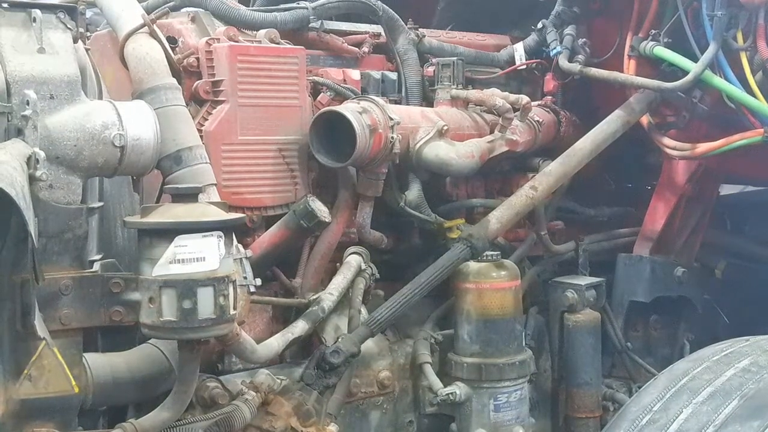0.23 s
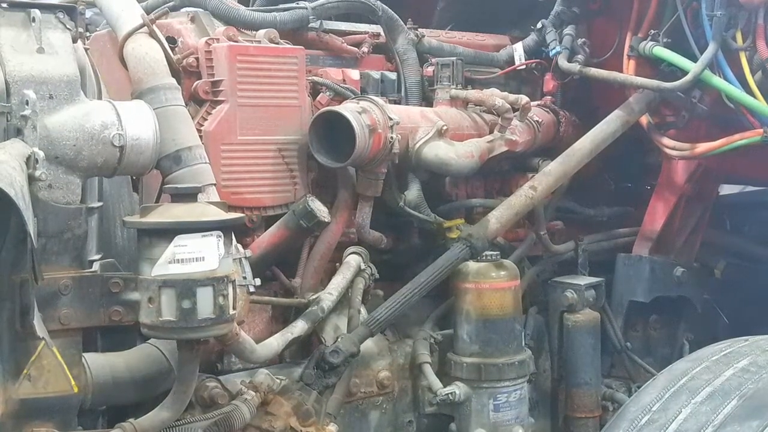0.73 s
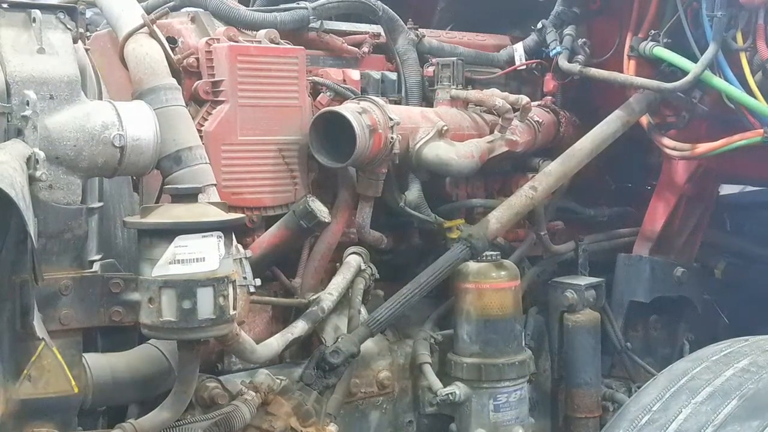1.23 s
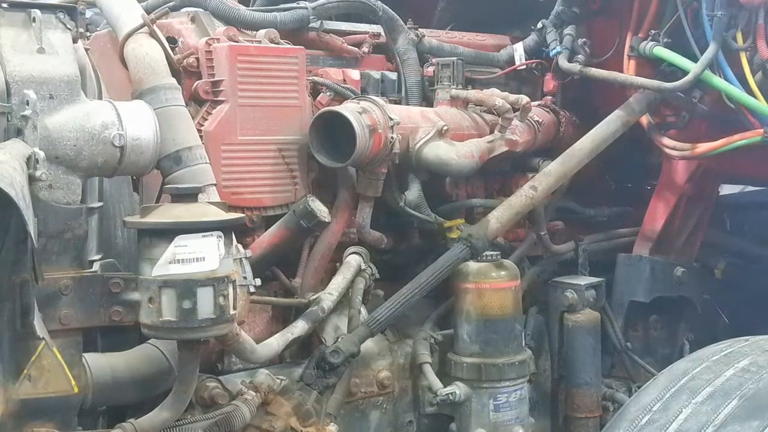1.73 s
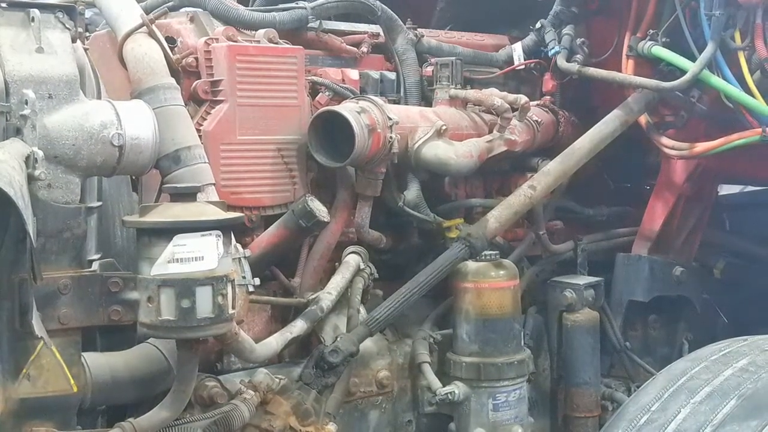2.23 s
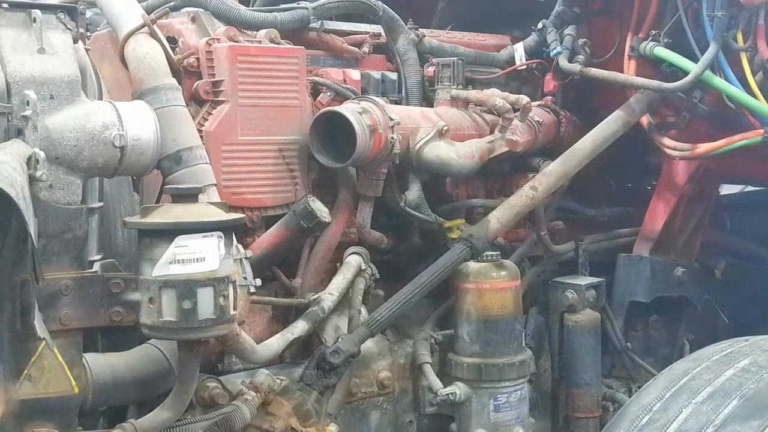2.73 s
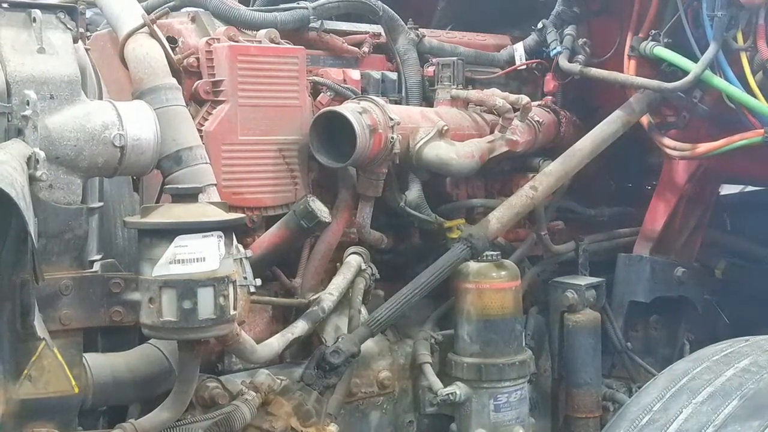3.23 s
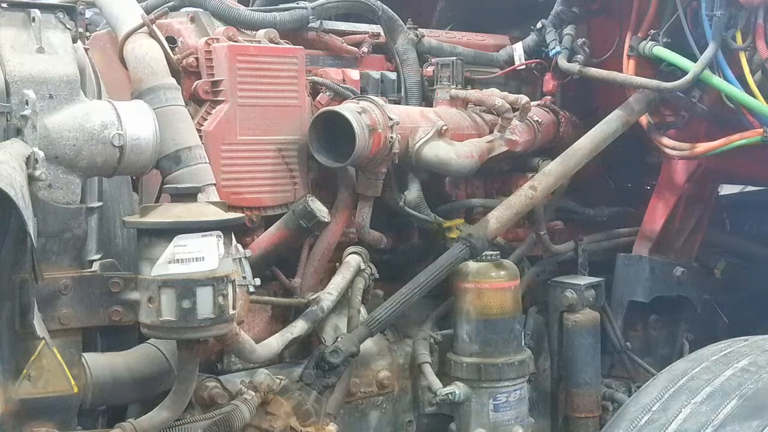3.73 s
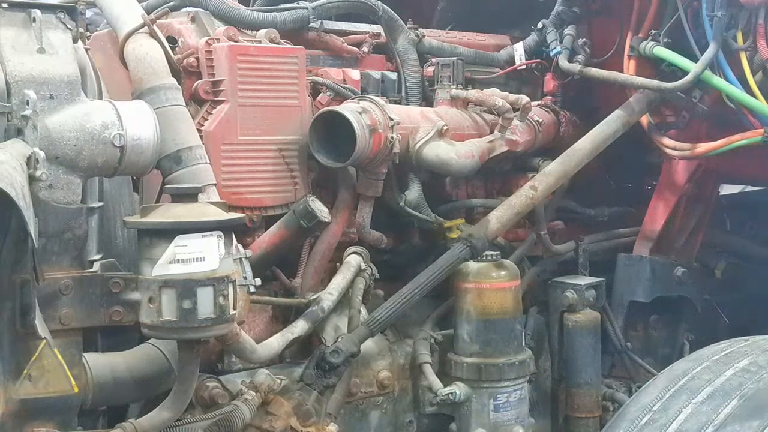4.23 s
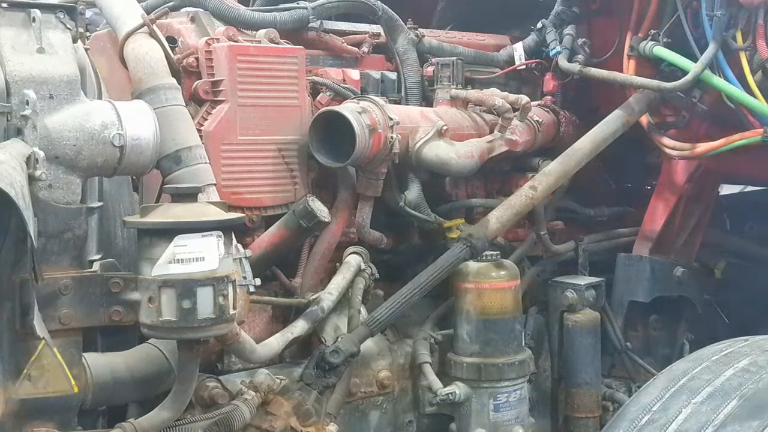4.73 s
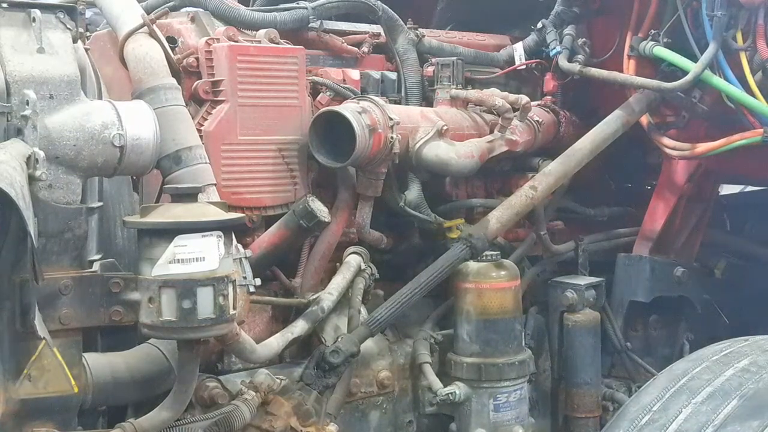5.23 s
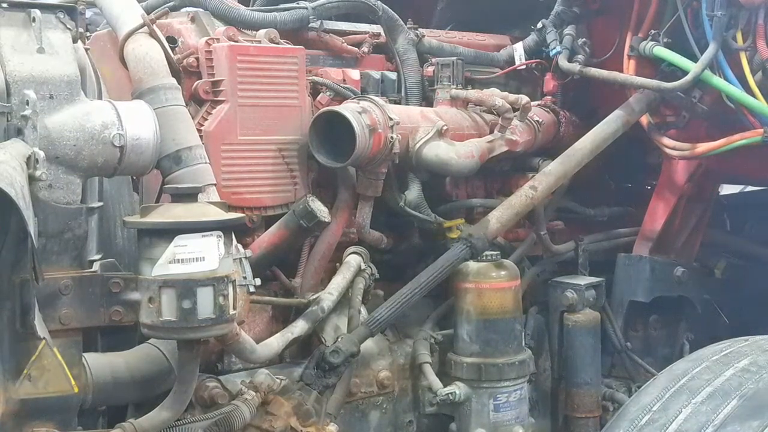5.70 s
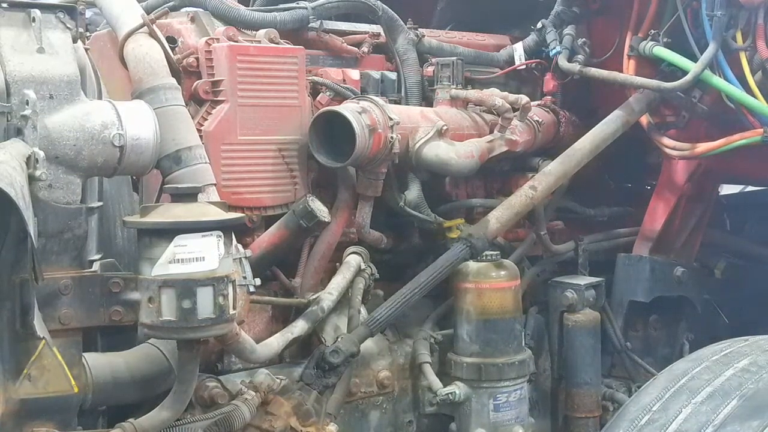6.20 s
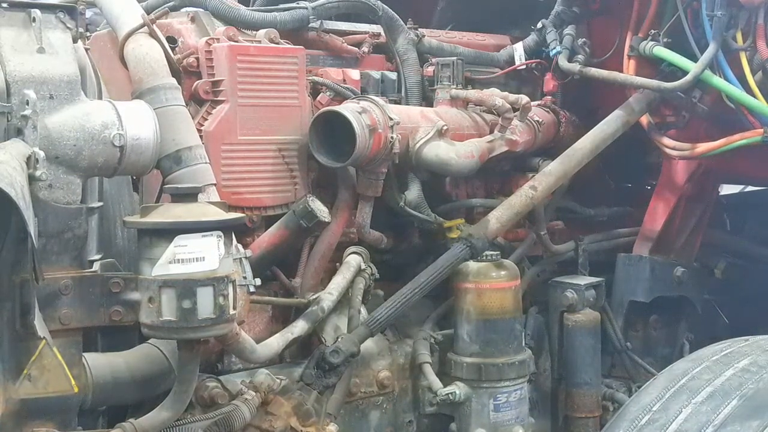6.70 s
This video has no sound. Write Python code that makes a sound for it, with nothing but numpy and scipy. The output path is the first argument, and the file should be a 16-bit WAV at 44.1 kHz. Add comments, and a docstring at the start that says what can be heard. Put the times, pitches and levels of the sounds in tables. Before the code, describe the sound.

A six-cylinder truck diesel, hood open, is already roaring fast. After about a second it sags, is revved up again briefly, then winds down to a knocking, rattling idle by four seconds. Intake drone and fuzzy turbo whistle follow the speed. A faint short squeak slides down near the end. The microphone is very close, clipping hard, with dull treble.

```python
"""First heard is the fast roar of a six-cylinder truck diesel just started, hood open, microphone very close.
It sags, is revved once more and sinks to idle. Each firing shakes the block, knocks in its casting and
rattles the valve gear: noise bursts through resonances. The open intake drones in multiples of the crank
speed, the turbo whistles as a fuzzy tone, and one faint squeak slides down near the end.
The microphone input is driven hard into clipping, and the recorder is dull."""
import sys
import numpy as np
from scipy import signal
from scipy.fft import rfft, irfft, next_fast_len
from scipy.io import wavfile
from scipy.ndimage import uniform_filter1d

SR = 44100
rng = np.random.default_rng(int(sys.argv[2]) if len(sys.argv) > 2 else 0)


def to_wav(s):
    """Save 16-bit WAV."""
    ch = np.atleast_2d(s).T  # columns
    pcm = np.round(np.clip(ch, -1, 1) * 32767)  # PCM
    wavfile.write(sys.argv[1], SR, pcm.astype(np.int16))


N = 306936
TIME = np.arange(N) / SR  # s


def gain_of(db):
    """Decibels to amplitude."""
    return 10 ** (np.asarray(db) / 20)


def evened(x):
    """Scales to rms 1."""
    return x / np.sqrt(np.mean(x ** 2) + 1e-20)


def read(points, hz):
    """Gain of a spectrum at hz, read along a logarithmic frequency scale."""
    f, db = np.transpose(points)
    return gain_of(np.interp(np.log(hz + 1), np.log(f), db))


def colour(x, points):
    """Filters x by a spectrum."""
    size = next_fast_len(N + 4096)
    gain = read(points, np.fft.rfftfreq(size, 1 / SR))
    return irfft(rfft(x, size) * gain, size)[:N]


def ring(x, modes):
    """Sends x through parallel resonances of alternating sign."""
    total = np.zeros(N)
    for k, (hz, width, db) in enumerate(modes):
        b, a = signal.iirpeak(hz, hz / width, SR)
        total += (-1) ** k * gain_of(db) * signal.lfilter(b, a, x)
    return total


def wander(hz):
    """Slow chance of rms 1, up to about hz changes a second."""
    steps = rng.standard_normal(N // 32 + 2000)
    lowpass = signal.butter(2, hz, fs=SR / 32, output="sos")
    slow = signal.sosfilt(lowpass, steps)[-(N // 32 + 1):]  # without the filter's run-in
    return evened(np.interp(np.arange(N) / 32, np.arange(len(slow)), slow))


def lagging(x, start, lag_s):
    """Follows x sluggishly from a start value, as a heavy rotor does."""
    keep = np.exp(-1 / (lag_s * SR))
    return start + signal.lfilter([1 - keep], [1, -keep], x - start)


def level(law, revs, pull, coast):
    """Level in dB of a part for the engine's speed and load."""
    idle_db, revs_db, pull_db, coast_db = law
    return idle_db + revs_db * revs + pull_db * pull + coast_db * coast


# engine speed, three firings to a turn of the crank: (t/s, firing rate f/Hz)
SPEED = [(0, 75.21), (0.9, 75.2), (1.35, 61.11), (1.82, 48.72), (1.98, 58.85), (2.15, 72.61), (2.25, 76.92),
         (2.55, 66.16), (3.15, 49.85), (3.9, 32.55), (4.3, 32.73), (4.8, 31.49), (5.7, 30.54),
         (6.96, 30.11)]


def firing_rate():
    """Firings per second, joined by straight lines between the points."""
    s, rate = np.transpose(SPEED)
    return np.interp(TIME, s, rate)


def effort(rate, smooth_s=0.06, coast_hz_per_s=22):
    """Three shares from 0 to 1: speed above idle, pulling (speeding up) and coasting (slowing down)."""
    change = uniform_filter1d(np.gradient(rate) * SR, max(1, round(smooth_s * SR)))
    revs = (rate - rate.min()) / np.ptp(rate)
    pull = np.clip(change / change.max(), 0, 1)
    coast = np.clip(-change / coast_hz_per_s, 0, 1)
    return revs, pull, coast


# strength of each cylinder, in firing order: (relative level/dB)
CYLINDERS = [0.52, 1, -1.3, -0.44, 0.5, -0.58]


def strokes(firings, lag, repeat, depth_db):
    """One rough burst a firing; each cylinder partly repeats its own burst, the rest is new each time.

    lag is a share of the firing interval, depth_db the decay over one interval.
    """
    count, within = np.divmod(firings - lag, 1)
    cylinder = count.astype(int) % len(CYLINDERS)
    age = np.arange(N) - np.searchsorted(count, count)  # samples since the burst began
    own = rng.standard_normal((len(CYLINDERS), 4096))[cylinder, age % 4096]
    repeat = np.clip(repeat, 0, 1)
    burst = np.sqrt(repeat) * own + np.sqrt(1 - repeat) * rng.standard_normal(N)
    decay_db = np.take(CYLINDERS, cylinder) - depth_db * within
    return burst * uniform_filter1d(gain_of(decay_db), size=100)


# resonances of the block and its covers: (f/Hz, width/Hz, relative level/dB)
BLOCK = [(570, 35.3, -6.5), (608, 29.6, 0), (663.2, 35.2, -1), (834.3, 31.5, -5), (888, 40, -7.5),
         (980, 100, -9.5), (1148.5, 84, -12.5)]
# knock: (idle level/dB, dB more at top speed, dB more pulling hard, dB more coasting)
KNOCK_LEVEL = (-16.5, 5, 1.5, -0.33)


def knock(firings, load):
    """Each burn strikes the casting, which rings at its resonances."""
    ringing = evened(ring(strokes(firings, lag=0.1479, repeat=0.76, depth_db=1.5), BLOCK))
    uneven_db = 1.3 * wander(15)  # no two burns are equally hard
    return gain_of(level(KNOCK_LEVEL, *load) + uneven_db) * ringing


# spectrum of the valve gear and injector rattle: (f/Hz, relative level per Hz/dB)
RATTLE = [(25, -0.5), (60, 3), (100, 2), (180, -3), (350, 1.5), (450, 1.5), (560, 5.5), (1000, -1.5),
          (1300, -6), (2100, -12.5), (2700, -18), (3500, -18.5), (4200, -17.5), (5200, -27.5),
          (7000, -33.5)]
# rattle: (idle level/dB, dB more at top speed, dB more pulling hard, dB more coasting)
RATTLE_LEVEL = (-22, 13, 2, 0.64)


def rattle(firings, load):
    """Loose valve gear and injectors chatter at each firing as broad coloured noise."""
    chatter = evened(colour(strokes(firings, lag=.17, repeat=0.62, depth_db=2.5), RATTLE))
    return gain_of(level(RATTLE_LEVEL, *load)) * chatter


# resonances that the injectors ring in the valve cover: (f/Hz, width/Hz, relative level/dB)
COVER = [(1353, 90, 2), (1579, 95, -0.5), (1827, 130, -2.5), (2095, 84, -2), (2290, 75, -2),
         (2670, 240, -10), (3100, 90, -11), (4130, 750, -22.5)]
# ticks: (idle level/dB, dB more at top speed, dB more pulling hard, dB more coasting)
TICKS_LEVEL = (-25, -6, -2.5, -1.5)


def ticks(firings, load):
    """The injectors tick in short bursts that ring the valve cover, most plainly at idle."""
    ticking = evened(ring(strokes(firings, lag=.18, repeat=.5, depth_db=10.5), COVER))
    return gain_of(level(TICKS_LEVEL, *load)) * ticking


SETTLE_DB_PER_S = -0.51


def clatter(firings, load):
    """Knock, rattle and ticks together soften steadily as the engine settles after the start."""
    parts = knock(firings, load) + rattle(firings, load) + ticks(firings, load)
    return gain_of(SETTLE_DB_PER_S * TIME) * parts


# how far the block rocks at each firing rate: (f/Hz, level/dB before the dip below)
ROCKING = [(30, -17), (35, -20.5), (43, -13.5), (52, -14.5), (64, -16), (76, -15.5)]
THROB_DIP_DB, THROB_DIP_POWER = -27.5, 5.5  # dip at full pull and top speed; power of the speed share


def throb(firings, rate, revs, pull, lead=0.37):
    """The block rocks once a firing; the throb thins out while pulling hard near top speed."""
    rocking = np.sqrt(2) * np.cos(2 * np.pi * (firings + lead))
    dip_db = THROB_DIP_DB * pull * revs ** THROB_DIP_POWER
    return read(ROCKING, rate) * gain_of(dip_db) * rocking


# low growl: (multiple of the crank speed, relative level/dB, dB more pulling hard)
GROWL = [(4, -2.5, -8.5), (5, -10.5, 8), (6, 1, 7), (7, -9, 20.5)]
# boom that the growl sweeps through: (f/Hz, gain/dB)
BOOM = [(60, -38), (68, -34.5), (80, -23.5), (91, -24), (101, -28.5), (114, -29.5), (133, -23),
        (152, -25.5), (180, -33)]
GROWL_COAST_DB = 3.5  # rise when coasting


def growl(firings, rate, pull, coast, rough=0.45):
    """Rough low multiples of the crank speed boom at certain speeds; the odd ones leap out when pulling."""
    crank, crank_hz = firings / 3, rate / 3
    lines = np.zeros(N)
    for multiple, db, pull_db in GROWL:
        k = round(multiple)
        roughness = evened(1 + rough * wander(25))
        strength = read(BOOM, k * crank_hz) * gain_of(db + pull_db * pull) * roughness
        lines += strength * np.sqrt(2) * np.cos(2 * np.pi * (k * crank + rng.random()))
    return gain_of(GROWL_COAST_DB * coast) * lines


# intake drone: (multiple of the crank speed, relative level/dB)
DRONE = [(1, -21), (2, -9), (7, -8), (9, 0.5), (10, -1.5), (11, -2.5), (12, -7.5), (13, -2.5), (14, 0.5),
         (15, -8.5), (16, -3.5), (17, -5.5), (19, -1.5), (22, -2)]
# colour that the intake pipe gives the drone: (f/Hz, gain/dB)
PIPE = [(30, -3.5), (90, 1), (135, -1.5), (185, -5), (228, 0.5), (310, 3.5), (355, -2), (400, -15.5),
        (470, -13), (550, -6.5)]
# gain on the drone: (at idle/dB, dB more at top speed, dB more pulling hard, dB more coasting)
DRONE_LEVEL = (-30, 18.5, -5, 1)


def drone(firings, rate, load, waver=.11):
    """Unequal gulps of air give lines at multiples of the crank speed, coloured by the pipe."""
    crank, crank_hz = firings / 3, rate / 3
    lines = np.zeros(N)
    for multiple, db in DRONE:
        k = round(multiple)
        strength = gain_of(db) * read(PIPE, k * crank_hz) * (1 + waver * wander(29))
        lines += strength * np.cos(2 * np.pi * (k * crank + rng.random()))
    return gain_of(level(DRONE_LEVEL, *load)) * lines * (rate / rate.max()) ** 0.92


# resonances of the air puffs in the intake: (f/Hz, width/Hz, relative level/dB)
PUFFS = [(77.6, 14, -1.5), (99.9, 17.6, -0.5), (129.8, 15, -4.5), (231, 21.6, -3), (281.7, 20, -4),
         (314, 44.4, -6)]
# puffs: (idle level/dB, dB more at top speed, dB more pulling hard, dB more coasting)
PUFFS_LEVEL = (-24, 7.5, 8.5, -1)


def puffs(firings, load):
    """A rough puff of air a firing rings the intake."""
    air = evened(ring(strokes(firings, lag=.8, repeat=0.48, depth_db=7.5), PUFFS))
    return gain_of(level(PUFFS_LEVEL, *load)) * air


GULP_S, GULP_LENGTH_S, GULP_DB = 4.14, 0.09, 5


def intake(firings, rate, load):
    """Drone and puffs from the open intake, with one brief gulp of air as the speed comes down to idle."""
    gulp_db = GULP_DB * np.exp(-((TIME - GULP_S) / GULP_LENGTH_S) ** 2)
    return gain_of(gulp_db) * (drone(firings, rate, load) + puffs(firings, load))


TURBO_HZ, TURBO_POWER = 3930, 0.65  # pitch at top speed, power law of pitch against speed
TURBO_LAG_S, TURBO_START = 0.36, 0.92  # lag, share of top speed at first
# level at top speed, growth with pitch, level while freewheeling
TURBO_DB, TURBO_DB_PER_OCTAVE, TURBO_COAST_DB = -26.5, 17.5, -34.5


def turbo(rate, coast, width_hz=115, flutter_db=0.6, fade_s=0.25):
    """A fuzzy whistle lags behind the engine speed; it freewheels faintly while the engine slows."""
    hz = TURBO_HZ * lagging(rate / rate.max(), TURBO_START, TURBO_LAG_S) ** TURBO_POWER
    free = lagging(coast, 0, fade_s)
    driven_db = TURBO_DB + TURBO_DB_PER_OCTAVE * np.log2(hz / TURBO_HZ)
    db = (1 - free) * driven_db + free * TURBO_COAST_DB
    angle = 2 * np.pi * np.cumsum(hz) / SR
    whistle = wander(width_hz) * np.cos(angle) + wander(width_hz) * np.sin(angle)
    return gain_of(db) * evened(whistle * gain_of(flutter_db * wander(29)))


SQUEAK_S, SQUEAK_LENGTH_S, SQUEAK_DB = 6.07, 0.14, -25  # start, length, peak of the swell
SQUEAK_HZ, SQUEAK_FALL_HZ_PER_S = 500, 510


def squeak():
    """A short, nearly pure tone that swells and fades as it slides down."""
    age = np.clip(TIME - SQUEAK_S, 0, SQUEAK_LENGTH_S)
    hz = SQUEAK_HZ - SQUEAK_FALL_HZ_PER_S * age
    swell = np.sin(np.pi * age / SQUEAK_LENGTH_S)
    tone = np.sqrt(2) * np.sin(2 * np.pi * np.cumsum(hz) / SR)
    return gain_of(SQUEAK_DB) * swell * tone


def scene():
    """The engine at arm's length: all its parts follow the crank, and the squeak comes on its own."""
    rate = firing_rate()
    firings = np.cumsum(rate) / SR  # running count
    load = revs, pull, coast = effort(rate)
    bass = throb(firings, rate, revs, pull) + growl(firings, rate, pull, coast)
    engine = clatter(firings, load) + bass + intake(firings, rate, load) + turbo(rate, coast)
    return (engine + squeak())[None]


# treble response of the recorder: (f/Hz, gain/dB)
RECORDER = [(3000, 0), (4200, 0), (5000, -3), (6000, -10), (6800, -22.5), (7500, -36.5)]
EDGE_HZ = 7400  # upper limit of the recorder


def record(dry, ceiling=0.35, hardness=8):
    """The microphone input flattens the peaks and blocks any steady offset; then the treble rolls off."""
    clipped = dry[0] / (1 + abs(dry[0] / ceiling) ** hardness) ** (1 / hardness)
    dull = colour(clipped - clipped.mean(), RECORDER)
    lowpass = signal.firwin(255, EDGE_HZ, window=("kaiser", 9), fs=SR)
    return signal.oaconvolve(dull, lowpass, "same")[None]


dry = scene()
out = record(dry)
to_wav(out)
```